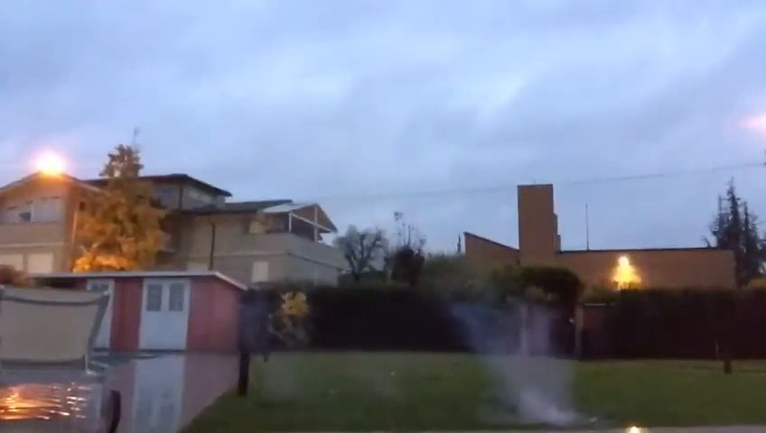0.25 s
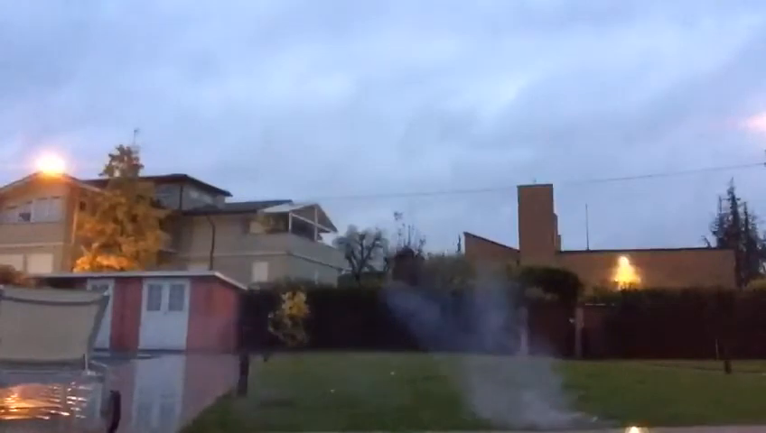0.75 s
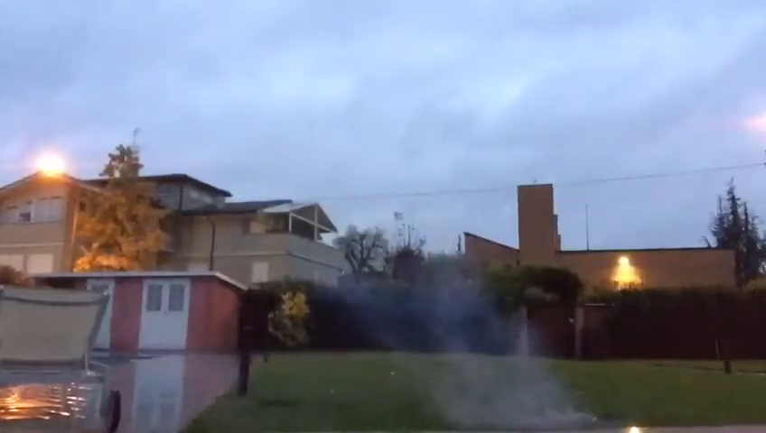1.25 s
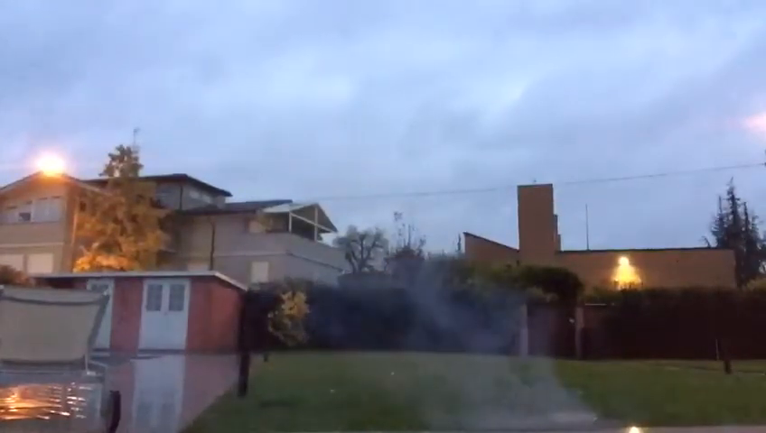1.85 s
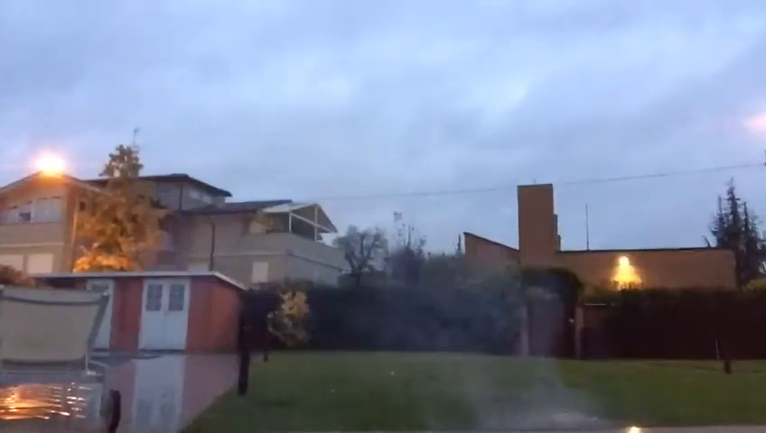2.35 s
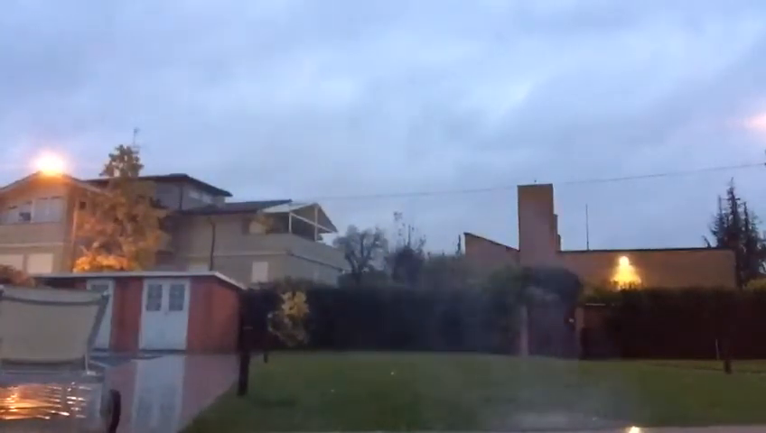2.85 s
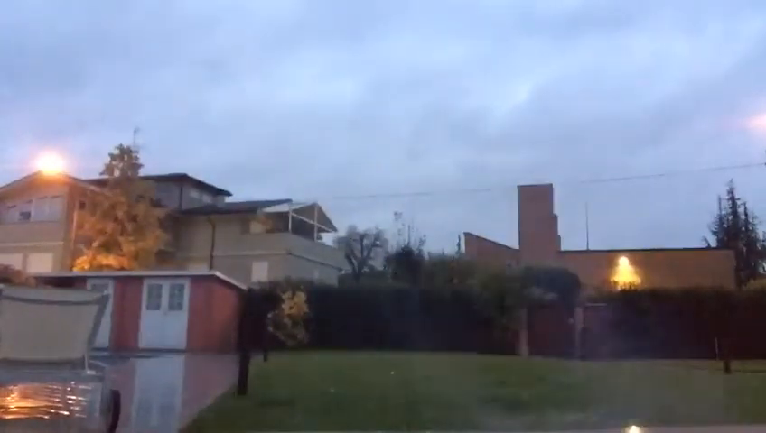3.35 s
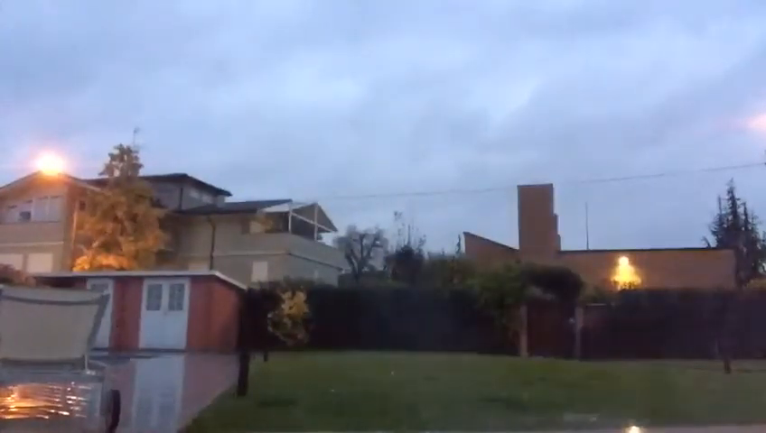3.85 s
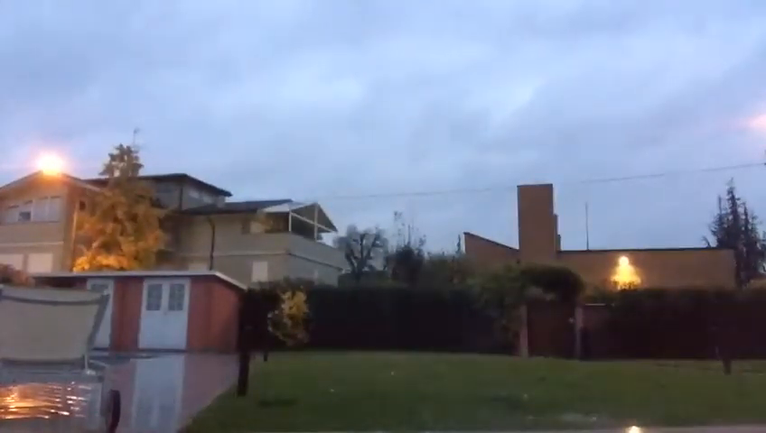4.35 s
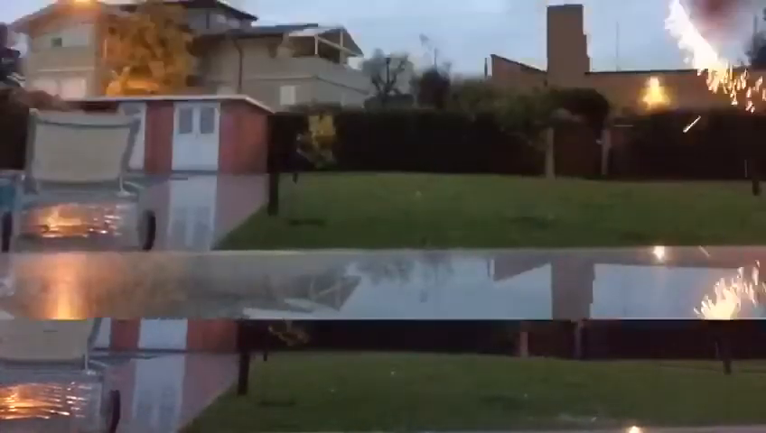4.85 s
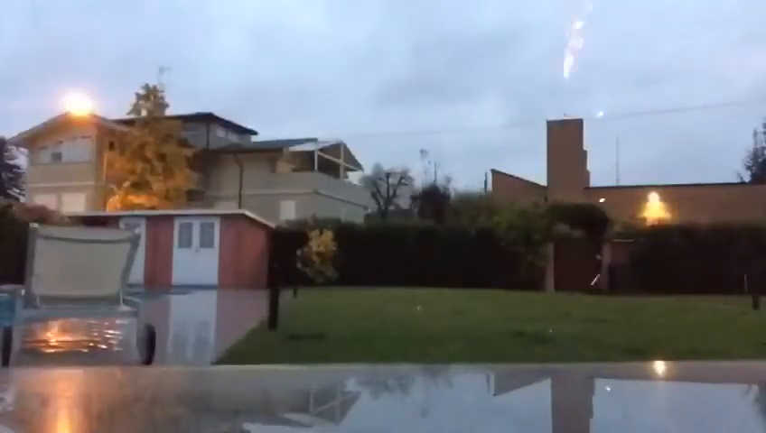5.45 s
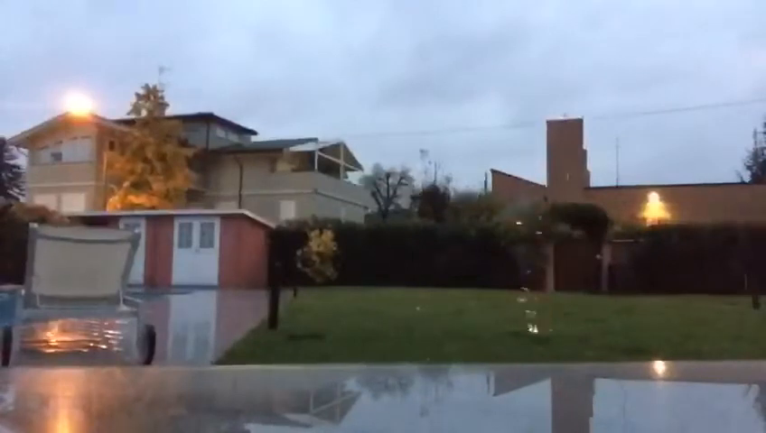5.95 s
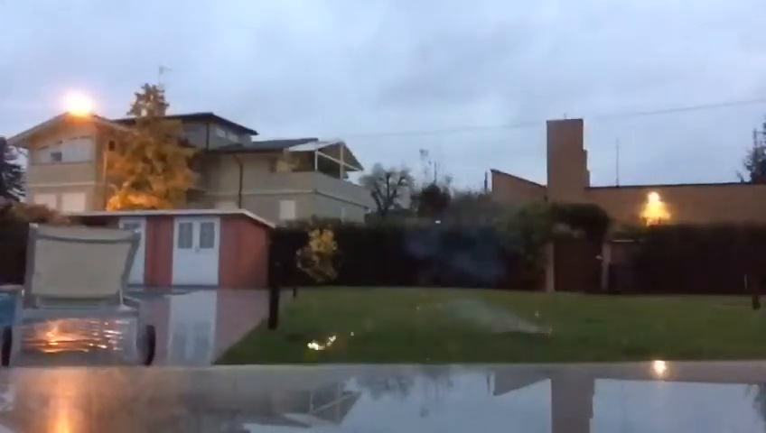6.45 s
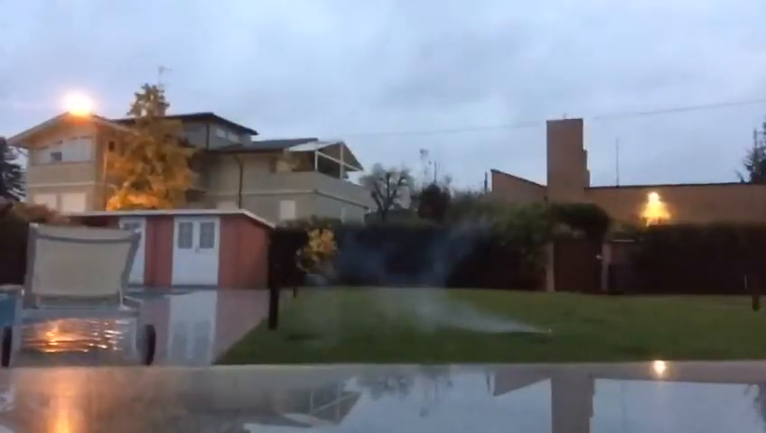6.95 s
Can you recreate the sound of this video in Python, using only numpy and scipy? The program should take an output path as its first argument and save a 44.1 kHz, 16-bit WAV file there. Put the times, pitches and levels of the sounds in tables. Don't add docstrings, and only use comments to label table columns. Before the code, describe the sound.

An open lawn among houses, heard through a small, easily overloaded microphone. The fading echoes of a distant bang open over low, wavering traffic rumble and an engine drone near 63 Hz that surges and cuts off. A hollow knock sounds at 0.4 s, a tiny click at 0.6, another knock at 2.7. At 3.0 s a heavy muffled charge goes off in a rapid stutter of deep thumps and dull cracks over about 0.2 s, leaving low ringing and a weak return near 3.5. Soft thuds and hollow debris knocks follow from 3.6 to 4.3, strongest around 4.05-4.15. From about 4.6 a fuse hisses, sputtering and brightening to 5.1, then thinning. Brief spits at 6.18 lead into a huge clipped bang at 6.2, with a boom and roaring echoes; a second equally harsh bang hits at 6.67, its echoes dulling until the rumble drops back around 7.0.

```python
import sys
import numpy as np
from scipy import signal
from scipy.fft import rfft, irfft, next_fast_len
from scipy.io import wavfile
from scipy.ndimage import uniform_filter1d

SR = 44100
rng = np.random.default_rng(int(sys.argv[2]) if len(sys.argv) > 2 else 0)


def field_ratio(decibels):
    return 10 ** (np.asarray(decibels, dtype=float) / 20)


def store_pcm(level_fs):
    pcm = np.round(np.clip(level_fs, -1, 1) * 32767).astype(np.int16)
    wavfile.write(sys.argv[1], SR, np.atleast_2d(pcm).T)


N = 317516
SIZE = next_fast_len(N)


def unit(x):
    return x / np.sqrt(np.mean(x ** 2))


def colour(x, points):
    hz, db = np.transpose(points)
    f = np.maximum(np.arange(SIZE // 2 + 1) * SR / SIZE, 1)
    gain = field_ratio(np.interp(np.log(f), np.log(hz), db, -90, -90))
    return unit(irfft(rfft(x, SIZE) * gain, SIZE)[:N])


def band(x, hz, width):
    return signal.lfilter(*signal.iirpeak(hz, hz / width, fs=SR), x)


def walk(rate):
    hold = int(SR / rate)
    steps = np.repeat(rng.standard_normal(N // hold + 1), hold)
    return 1.102 * uniform_filter1d(uniform_filter1d(steps, hold), hold)[:N]


def swell(s, db, rise, fall):
    age = np.arange(N) / SR - s
    slope = np.minimum(age / max(rise, .001), -age / max(fall, .001))
    return np.exp(np.log(10) * (db / 10 + slope))


# frequency in Hz, level in dB per Hz.
TOWN_SPECTRUM = [(15, -44.5), (25, -19), (59, -4.5), (78, -0.5), (98, -8), (299, -10), (426, -15),
                 (471, -14), (762, -12), (1120, -16.5), (1350, -23), (1940, -30.5), (2380, -30),
                 (3950, -40.5), (9110, -43), (10600, -49.5), (13800, -79), (22000, -120)]
# time in seconds, level change in dB.
TOWN_LEVEL = [(0, 2), (1.3, .5), (1.5, 2.5), (1.9, -0.5), (2.3, .5), (3, 1.5), (4.6, 1), (5.1, 2.5),
              (5.6, 1), (7.02, -1), (7.04, -9), (7.2, -6)]
# peak in
# seconds, level in dB, rise in seconds per 10 dB, fall in seconds per 10 dB.
ENGINE_SURGES = [(.21, -41, 0.044, .12), (.71, -34.5, .19, .02), (1.17, -37, .2, .015),
                 (1.28, -41, .04, 0.27), (1.72, -42, .04, .04), (1.87, -46, .03, 0.44),
                 (2.29, -41, 0.026, .17), (2.56, -42, .03, .2), (2.83, -36, 0.027, .05),
                 (3.25, -42, .02, .05), (3.46, -36.5, .12, .12), (3.69, -31, 0.061, 0.13),
                 (3.97, -32, 0.35, 0.039), (4.25, -31, 0.25, 0.043), (4.61, -31.5, 0.18, .025),
                 (4.84, -44, .12, .045), (5.79, -46.5, 1, .02), (6.0, -45, .12, .025)]


def town():
    town_db, idle_hz = -39, 63.4
    rumble = rfft(colour(rng.standard_normal(N), TOWN_SPECTRUM), SIZE)
    octave = np.log2(np.maximum(np.arange(len(rumble)) * SR / SIZE, 1))
    centres = np.log2([40, 80, 150, 250, 380, 550, 750, 1000, 1400, 2200, 4000])
    depth_db = np.interp(centres, np.log2([40, 300, 1000, 4000]), [3.8, 2.7, 2.1, 0.14])
    bed = 0
    for share, depth in zip(np.eye(len(centres)), depth_db):
        register = irfft(rumble * np.interp(octave, centres, share), SIZE)[:N]
        waver = 0.19 * walk(1.4) + 0.18 * walk(9) + 0.75 * walk(35)
        bed = bed + register * field_ratio(depth * waver)
    level_db = town_db + np.interp(np.arange(N) / SR, *np.transpose(TOWN_LEVEL))
    engine_hz = idle_hz * (1 + .06 * walk(9))
    drone = np.sin(2 * np.pi * np.cumsum(engine_hz) / SR) * field_ratio(2 * walk(12))
    surges = np.sqrt(sum(swell(*row) for row in ENGINE_SURGES))
    return unit(bed) * field_ratio(level_db) + drone * field_ratio(1.5) * surges


# centre in Hz, width in Hz.
FUSE_JETS = [
    (2600, 1240),
    (6100, 3300),
    (9200, 2100),
]
# peak in seconds, level in dB, rise in seconds per 10 dB, fall in seconds per 10 dB.
FUSE_SPURTS = [
    [(4.7, -44.5, 0.059, 0.33), (4.86, -40, 0.13, 0.11), (5.088, -45, 0.1, .15), (5.6, -58, 0.73, 0.26)],
    [(4.66, -56, .04, .3), (4.77, -48, .08, .1), (4.914, -40, .12, 0.078), (5.298, -56.5, .2, 0.34),
     (5.64, -57, 0.24, 0.56), (6.1, -68, 0.24, .04)],
    [(4.66, -55.5, 0.036, .3), (4.874, -45, 0.1, 0.11), (5.09, -39.5, 0.11, 0.17), (5.34, -47.5, .2, 0.15),
     (5.878, -59.5, 0.33, .2)],
]
# start in seconds,
# peak level in dB.
SHARP_CLICKS = [(.573, -43), (3.0145, -34), (3.0475, -29), (3.0528, -22), (3.0576, -16.5), (3.0723, -22),
                (3.1142, -29), (3.117, -25.5), (6.178, -17.5), (6.189, -21), (6.1915, -29), (6.2935, -18),
                (6.3075, -18), (6.648, -27), (6.655, -34), (6.659, -33)]


def fuse():
    out = 0
    for spurts, (hz, width) in zip(FUSE_SPURTS, FUSE_JETS):
        flicker_db = 1.8 * rng.exponential(size=N) + 1.45 * walk(25)
        sputter = rng.standard_normal(N) * field_ratio(flicker_db)
        hiss = unit(band(band(sputter, hz, width), hz, width))
        out = out + np.sqrt(sum(swell(*row) for row in spurts)) * hiss
    age = np.arange(400) / SR
    for s, db in SHARP_CLICKS:
        spit = signal.lfilter([1], [1, -0.71], rng.standard_normal(400)) * np.exp(-age / .0005)
        out[int(s * SR):int(s * SR) + 400] += field_ratio(db) * spit
    return out


# start in seconds, level in dB, first pitch in Hz, last pitch in Hz, crack level in dB.
HARD_BLOWS = [
    (3.0124, -1.5, 730, 226, -13),
    (3.0479, 2, 725, 400, -28),
    (3.053, 5, 447, 238, -26),
    (3.059, -3, 520, 302, 3),
    (3.114, -6.5, 545, 129, -22),
    (4.1272, -17, 805, 225, -45),
    (4.154, -16, 930, 594, -28),
]
# start in seconds, level in dB, first pitch in Hz, length in cycles.
DULL_BOOMS = [(3.068, 2, 162, 1), (3.075, -17.5, 59, 4.1), (3.084, -4, 303, 1.1), (3.093, -11, 146, 2),
              (3.134, -14.5, 268, 2), (3.160, -13, 114, 1.8), (3.195, -25.5, 64, 3.6),
              (3.638, -28, 182, 2.8), (3.686, -26, 186, 3), (3.761, -27, 185, 2.1), (4.165, -22.5, 150, .9),
              (4.217, -22.5, 288, 1.45), (4.309, -28, 256, 1.6), (6.322, 1.5, 438, 1.3),
              (6.761, -22, 620, 1.8), (6.802, -11, 606, 3)]
# start in seconds, level in dB, first pitch in Hz, length in cycles.
HOLLOW_KNOCKS = [
    (.434, -25, 765, 5.3),
    (2.72, -25, 765, 3.5),
    (3.75, -21.5, 555, 9.4),
    (3.887, -23, 670, 3.6),
    (4.044, -14, 653, 5.4),
    (4.069, -25, 660, 4.5),
    (4.194, -22.5, 642, 9.7),
    (4.345, -43, 2650, 30),
]


def blows():
    rows = [(s, db, hz, last, 2.18 / last, crack) for s, db, hz, last, crack in HARD_BLOWS]
    for table, sag, crack_db in ((DULL_BOOMS, 0.804, -33), (HOLLOW_KNOCKS, 0.96, -38)):
        rows += [(s, db, hz, sag * hz, cycles / (sag * hz), db + crack_db) for s, db, hz, cycles in table]
    return rows


# pitch in Hz, width in Hz, level in dB.
THUMP_RINGING = [
    (102, 42, -23),
    (150, 7.5, -32),
    (221, 30, -25),
    (272, 33, -71),
]


def thumps():
    age, out = np.arange(int(.15 * SR)) / SR, np.zeros(N + SR)
    crack_band = signal.butter(4, [900, 3300], "bandpass", fs=SR, output="sos")
    for s, db, first_hz, last_hz, fade, crack_db in blows():
        noise = rng.standard_normal(len(age))
        soft = last_hz / first_hz
        hz = last_hz + (first_hz - last_hz) * np.exp(-age / 0.00262)
        rise = 1 - np.exp(-age / (.5 * soft ** 3 * fade + 0.00016))
        swing = np.sin(2 * np.pi * np.cumsum(hz) / SR) * rise * np.exp(-(age / fade / 1.25) ** 2)
        rough = noise * (1 - soft) * np.exp(-age / (1.02 * fade)) * np.sqrt(SR / first_hz)
        for _ in range(3):
            rough = band(rough, 1.25 * first_hz, 1.26 * first_hz)
        crack = signal.sosfilt(crack_band, noise[::-1] * np.exp(-age / 0.0019))
        blow = field_ratio(db) * (0.77 * swing + 0.31 * rough) + field_ratio(crack_db) * crack
        out[int(s * SR):int(s * SR) + len(age)] += blow
    out = out[:N]
    return out + sum(field_ratio(db + 32) * band(out, hz, width) for hz, width, db in THUMP_RINGING)


def echoes(rows, air_db, start=None):
    origin = start or 0
    age = np.arange(N) / SR - origin
    power = np.zeros((4, N))
    for s, db, rise, fall, edge_db in rows:
        dull = swell(s + origin, db, rise, fall)
        bright = swell(s + origin, db, rise, 0.94 * fall)
        airy = bright * field_ratio(2 * (0.64 * edge_db + air_db))
        power += [dull, bright * field_ratio(2 * edge_db), airy, airy]
    if start:
        power[2:] *= field_ratio(2 * np.outer([-10.5, -50], np.maximum(age, 0)))
    return power * (age >= 0)


BANG_TIMES = [
    6.2011,
    6.6711,
]
# peak in seconds, level in dB, rise in seconds per 10 dB,
# fall in seconds per 10 dB, edge level in dB.
CLOSE_RETURNS = [
    (.06, -6.5, 0.2, 0.047, -8),
    (.128, -12, 0.027, 0.025, -16.5),
    (.135, -18, .06, 0.058, -11),
]
HOUSE_RETURNS = [
    [(.105, -10.5, 0.04, 0.025, -7), (.282, -18, 0.19, 0.16, -6.5)],
    [(.25, -28.5, 0.041, 0.17, -9.5), (.347, -23.5, 0.34, .012, -14.5)],
]
MUFFLED_ECHOES = [
    (3.016, -10.5, 0.0016, 0.018, -16),
    (3.056, -0.5, 0.0037, 0.016, -17.5),
    (3.116, -14, 0.0022, 0.021, -16.5),
    (3.251, -38, .1, 0.017, -25),
    (3.39, -34.5, .13, 0.12, -21.5),
    (4.131, -26, 0.0017, 0.03, -24),
    (4.154, -31.5, .005, .018, -13),
    (4.208, -30, 0.018, 0.042, -27),
    (4.316, -42, 0.021, 0.12, -15),
]
DISTANT_ECHOES = [
    (.012, -38.5, .05, 0.018, -1.5),
    (.04, -31.5, 0.011, 0.033, -12),
    (.1, -43, 0.24, 0.08, 1.5),
    (.28, -48, 0.14, 0.055, -3.5),
    (7.045, -37.5, 0.028, 0.22, -8.5),
]
FLARE = [
    (.016, -25.5, .03, 0.0026, -10),
]


def echo_power():
    near_air_db = -8
    power = echoes(MUFFLED_ECHOES, -25) + echoes(DISTANT_ECHOES, -43)
    power = power + echoes(FLARE, near_air_db, start=6.178)
    for s, front in zip(BANG_TIMES, HOUSE_RETURNS):
        power = power + echoes(CLOSE_RETURNS + front, near_air_db, start=s)
    return power


# frequency in Hz, level in dB per Hz.
ECHO_BODY = [(24, -61), (40, -15), (76, -16.5), (200, -4.5), (254, -7), (288, 2), (390, -4.5), (563, 0.5),
             (879, -9), (1800, -28), (2340, -58), (3960, -120)]
ECHO_EDGE = [(760, -48.5), (1300, -22.5), (1430, -1.5), (1920, -2.5), (2660, 1), (2990, -1.5), (4200, -26),
             (5460, -40.5), (9240, -120)]
ECHO_AIR = [(2240, -10.5), (3800, -1.5), (4910, -5), (6220, -1), (8710, -6.5), (9720, -3.5), (10400, -30.5),
            (13500, -39), (22000, -120)]
# shock level in dB, shock length in seconds, overload in dB,
# blast level in dB, fade in seconds.
NEAR_BANGS = [
    (8, 0.002, 15, 2.5, 0.061),
    (8, 0.0013, 14, 5, 0.051),
]
# peak in seconds, level in dB, rise in seconds per 10 dB, fall in seconds per 10 dB.
HEDGE_RETURN = (3.5, -31.5, .12, .1)


def bangs():
    t = np.arange(N) / SR
    returns = rng.standard_normal(N) * field_ratio(2 * rng.exponential(size=N))
    spectra = (ECHO_BODY, ECHO_EDGE, ECHO_AIR)
    body, edge, air = (colour(returns, points) * field_ratio(1.7 * walk(90)) for points in spectra)
    blast = unit(band(band(rng.standard_normal(N), 676, 570), 684, 620))
    top = signal.sosfiltfilt(signal.butter(2, 7500, "highpass", fs=SR, output="sos"), air)
    cloud = np.sum(np.sqrt(echo_power()) * [body, edge, air - top, top], axis=0)
    near, over_db = np.zeros(N), np.zeros(N)
    for s, (shock_db, length, extra_db, blast_db, fade) in zip(BANG_TIMES, NEAR_BANGS):
        age = t - s
        early = np.exp(-(age / fade) ** 2) * (age >= 0)
        near += field_ratio(shock_db) * (1 - 2 * age / length) * (age >= 0) * (age < length)
        near += field_ratio(blast_db) * blast * early
        over_db += extra_db * early
        tear = np.exp(np.minimum(age, 0) / .0016) * (age < .003)
        near += .2 * (blast + edge + air) * tear
    return near + cloud * field_ratio(over_db) + blast * np.sqrt(swell(*HEDGE_RETURN))


def scene():
    return (town() + fuse() + thumps() + bangs())[None]


def top_cut(x):
    return signal.sosfilt(signal.butter(12, 16320, fs=SR, output="sos"), x)


def record(dry):
    mic_hz, top_hz = 10500, 15800
    heard = signal.sosfilt(signal.ellip(8, .2, 60, mic_hz, fs=SR, output="sos"), dry)
    clipped = heard / (1 + np.abs(heard / 1.02) ** 20) ** (1 / 20)
    below = signal.sosfiltfilt(signal.ellip(6, .1, 40, mic_hz, fs=SR, output="sos"), clipped)
    mix = below + field_ratio(-12) * (clipped - below)
    mix = signal.sosfilt(signal.ellip(8, .2, 40, top_hz, fs=SR, output="sos"), mix)
    return top_cut(np.clip(mix, -1, 1))


dry = scene()
out = record(dry)
store_pcm(out)
```